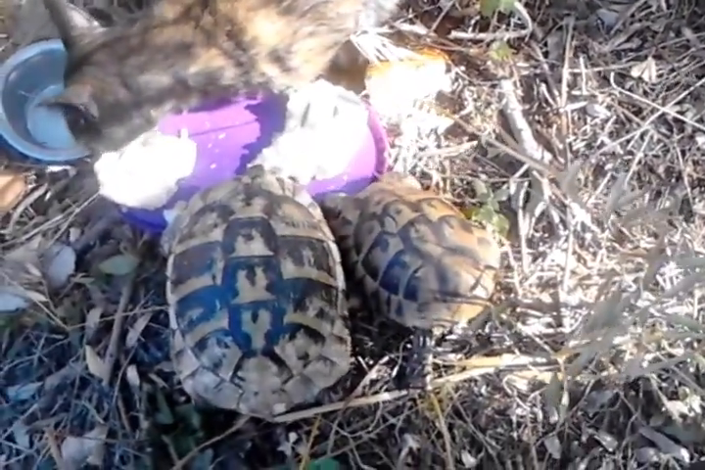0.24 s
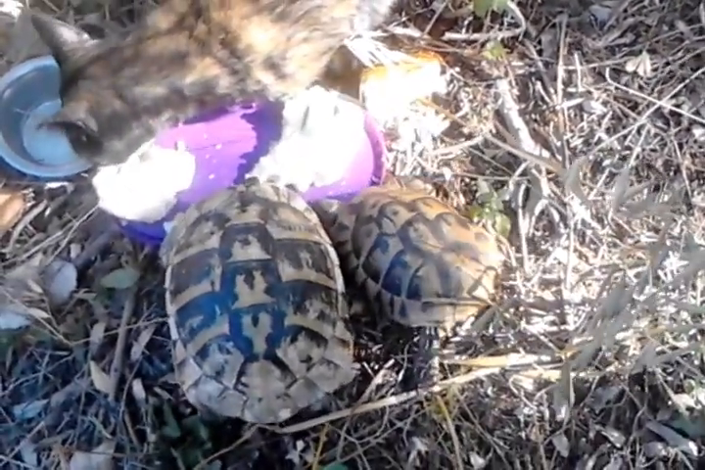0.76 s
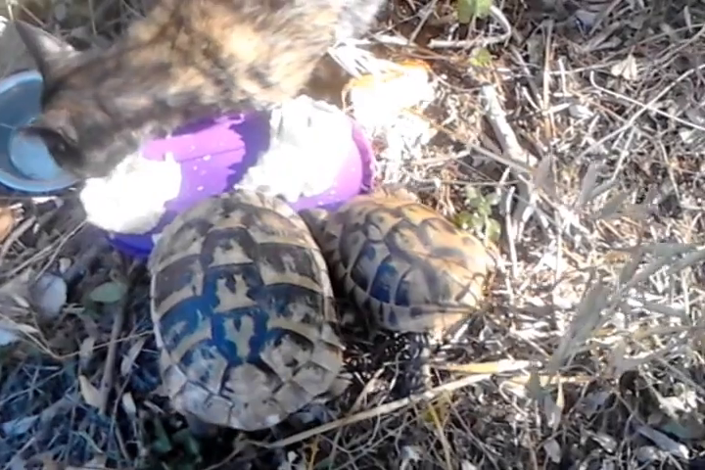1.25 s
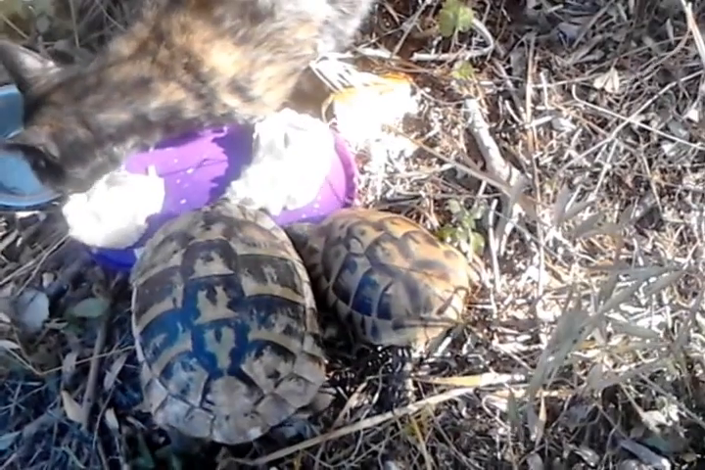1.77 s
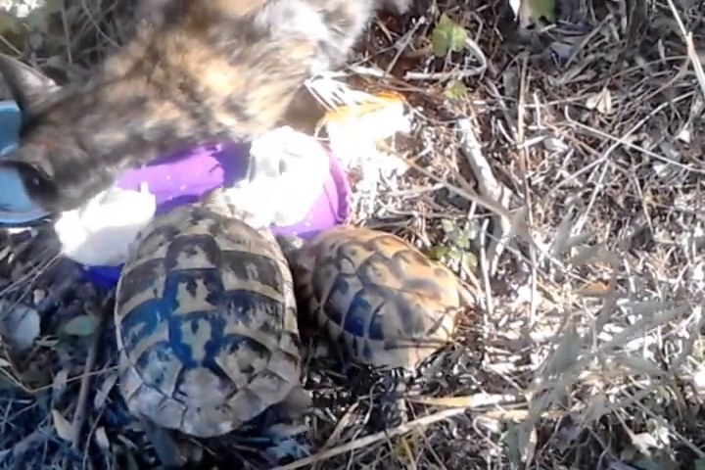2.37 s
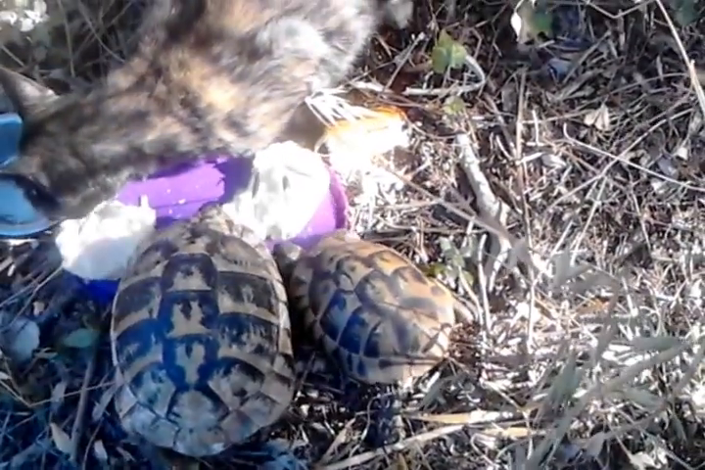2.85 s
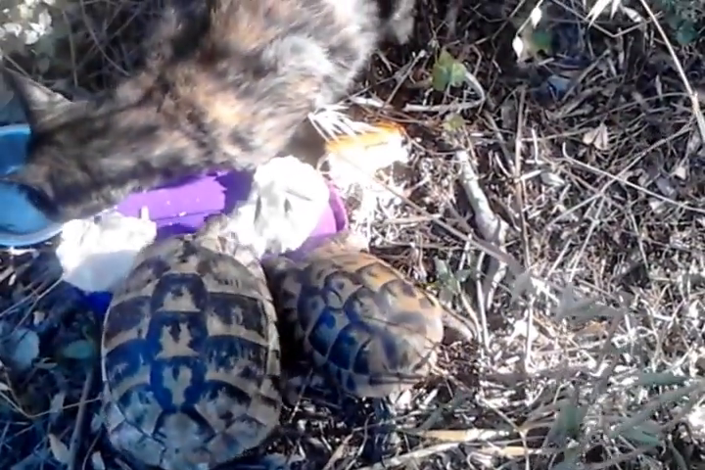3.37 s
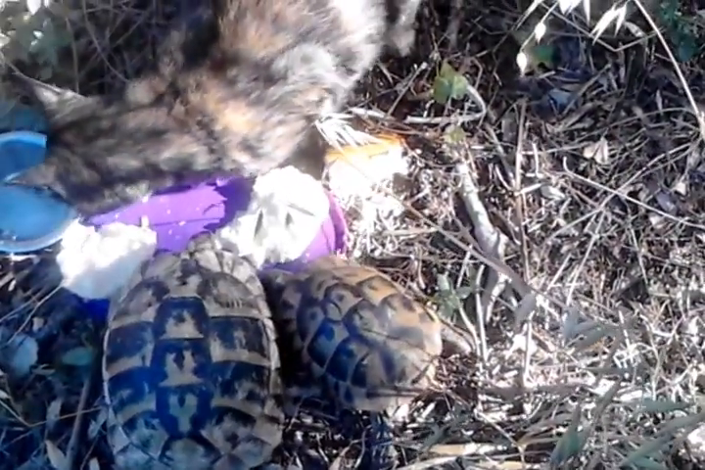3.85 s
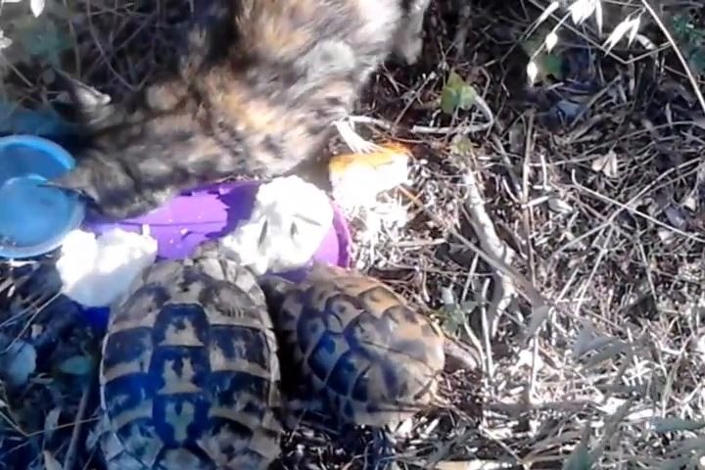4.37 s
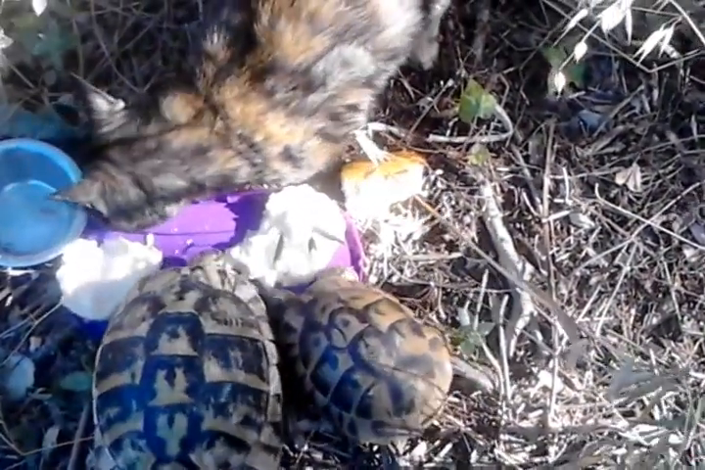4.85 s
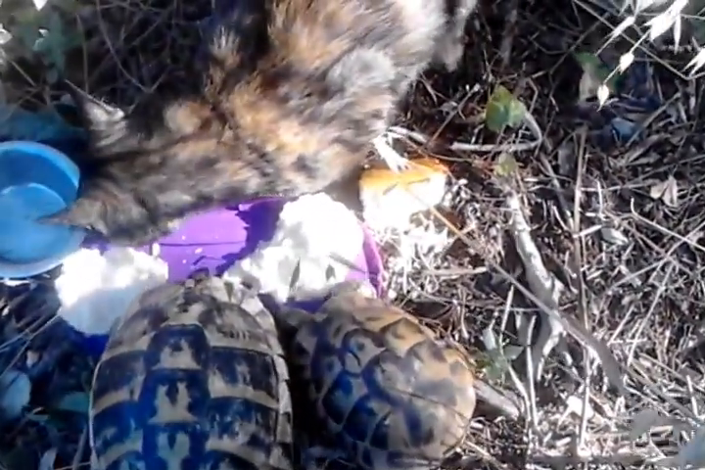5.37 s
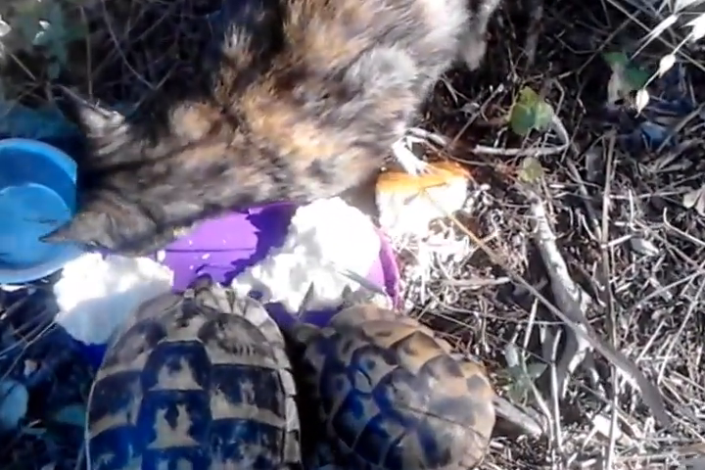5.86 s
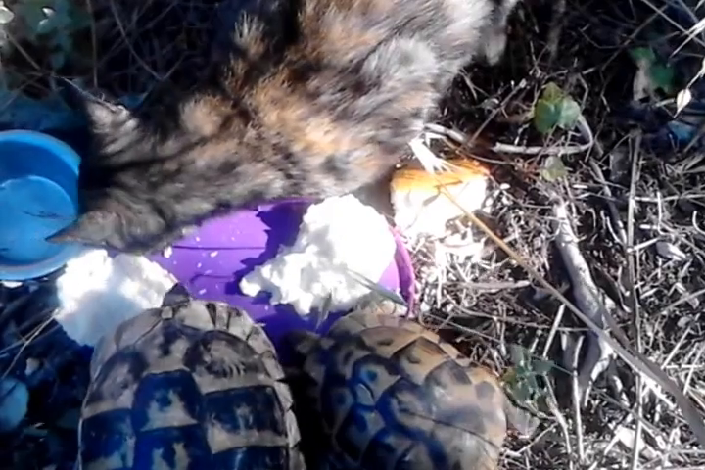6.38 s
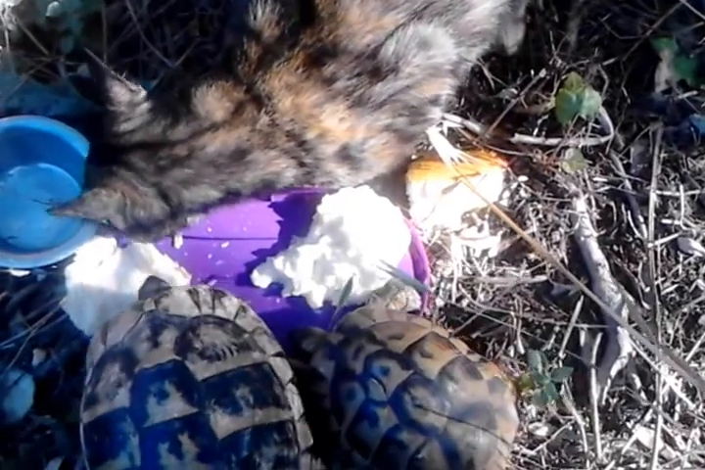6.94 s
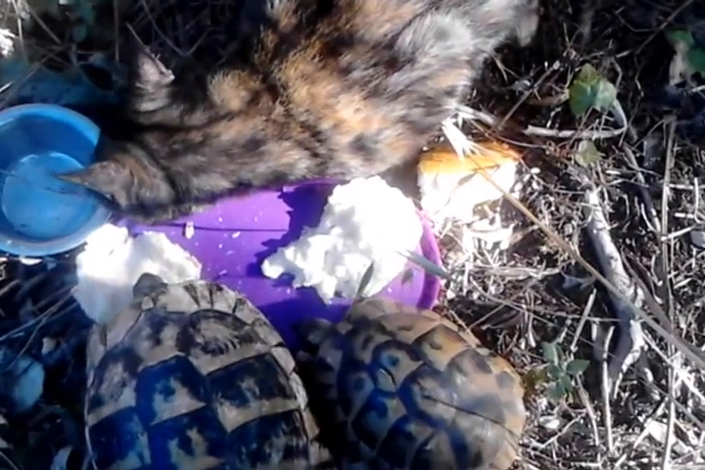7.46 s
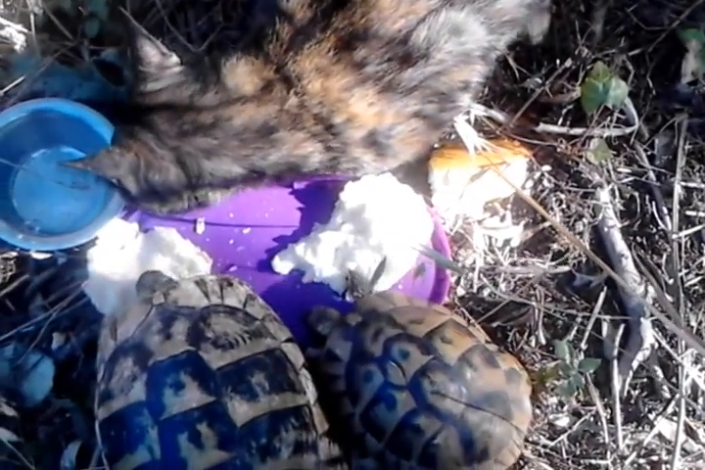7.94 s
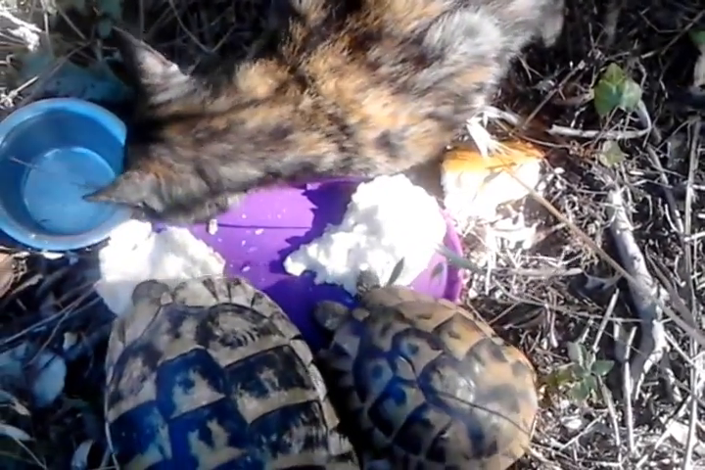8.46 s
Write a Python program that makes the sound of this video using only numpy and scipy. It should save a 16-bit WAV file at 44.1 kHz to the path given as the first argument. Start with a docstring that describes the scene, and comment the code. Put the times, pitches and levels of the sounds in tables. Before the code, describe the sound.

Tortoises and a cat feed outdoors: sparse tiny clicks, a few hard plastic knocks, one short groaning shove across litter, faint chirps far off.

```python
"""Cat and tortoises feeding

A cat and two tortoises feed from plastic bowls on dry leaves, close to a phone in a quiet garden.
Damped pops make the jaw ticks and bowl knocks; shaken resonances make the shove over the litter.
Gliding tones make small far-off birds, and shaped noise makes the outdoor hush.
The hush swells near some knocks and sinks back slowly. Mono, dull on top.
"""
import sys
import numpy as np
from scipy import signal
from scipy.fft import rfft, irfft, next_fast_len
from scipy.io import wavfile
from scipy.ndimage import map_coordinates

SR = 44100
rng = np.random.default_rng(int(sys.argv[2]) if len(sys.argv) > 2 else 0)


def generate_wav(sig):
    """Save sig (samples, or channels by samples) to the path in sys.argv[1] as 16-bit PCM at SR."""
    pcm = np.round(np.clip(np.atleast_2d(sig).T, -1, 1) * 32767).astype(np.int16)
    wavfile.write(sys.argv[1], SR, pcm)


N = 384111
TIME = np.arange(N) / SR  # whole scene [s]
AGE = np.arange(8192) / SR  # within one short sound [s]

# Knocks at the bowls: (time [s], contact level [dB], contact pitch [Hz], contact time constant [ms],
# wall echo [0-1], bowl ring level [dB], thud level [dB], thud pitch [Hz], hollow tail level [dB],
# tail width [share of thud pitch], leaf crackle level [dB])
KNOCKS = [(2.2975, -37, 900, 0.34, 0.6, -72.5, -46, 790, -43.5, 0.28, -69),
          (2.349, -46, 845, 0.71, 0.1, -80, -50, 680, -43.5, 0.57, -80.5),
          (2.361, -37, 600, 1, 0.2, -65, -32.5, 355, -54, 0.79, -65.5),
          (2.445, -16.5, 1510, 0.23, 0, -52, -33, 408, -50, 0.93, -46),
          (2.446, -21, 1715, 0.3, 0.04, -49, -33, 1120, -50, 0.46, -50.5),
          (2.4789, -35, 2760, 0.39, 0.4, -46, -44.5, 442, -36, 0.99, -44.5),
          (2.4828, -24, 900, 0.38, 0.1, -56, -34, 890, -55, 0.27, -45),
          (2.4888, -29, 1030, 0.64, 0.1, -50, -22, 895, -42, 0.16, -49),
          (2.4918, -32, 2310, 0.14, 0, -51, -43, 553, -42.5, 0.33, -56),
          (2.804, -9.5, 2188, 0.1, 0.05, -19.5, -31, 520, -45.5, 0.5, -41),
          (2.8085, -35, 1610, 0.18, 0, -53, -39, 385, -52, .8, -59),
          (2.8187, -41, 2664, 0.38, 0.08, -41.5, -36, 560, -44, 0.26, -53),
          (2.841, -50.5, 1600, 0.37, 0.01, -56, -49.5, 560, -52, .3, -65.5),
          (4.7255, -23, 2120, 0.19, 0.8, -56, -30.5, 700, -39, 0.81, -51),
          (4.7326, -25.5, 2420, 0.49, 0.13, -38.5, -31, 448, -42, 0.64, -45.5),
          (4.74, -53, 1040, 0.71, 0.2, -55, -34.5, 365, -51.5, 0.56, -56),
          (4.751, -50, 3050, .9, 0, -53, -44, 420, -58, .6, -61),
          (6.2193, -18.5, 1880, 0.2, 0.36, -76, -34, 867, -50, 0.26, -60),
          (6.2268, -40.5, 2300, 0.15, 0.1, -66.5, -43.5, 860, -70, .3, -75)]
# Modes of a plastic bowl: (frequency [Hz], relative level [dB], t60 [s])
BOWL_MODES = [(580.3, -15, 0.28), (1121, -6, 0.045), (1283, -0.5, 0.046), (1790, 6.5, 0.023),
              (2032, -6, 0.019), (2580, -2, 0.038), (2780, -6.5, 0.017), (3206, 0.5, 0.034),
              (3320, -2.5, 0.025), (3827, -10, .025), (4205, -7, 0.024), (4470, -9.5, 0.033),
              (5200, -4.5, 0.02), (5904, -2.5, 0.022), (6770, -4.5, 0.017), (7170, 2, 0.02)]

# Bowl shoved over dry leaves in lurches: (time [s], hold [s], body level [dB], crackle level [dB])
SHOVES = [(2.302, 0.04, -60.5, -83.5), (2.366, 0.064, -56, -67.5), (2.448, 0.019, -36, -50),
          (2.474, 0.02, -41.5, -54), (2.505, 0.014, -50, -56), (2.524, 0.0046, -59, -57),
          (2.537, 0.0029, -56, -70), (2.548, 0.014, -54.5, -69), (2.585, 0.035, -64.5, -79)]
SHOVE_RISE_DB_PER_S, SHOVE_FALL_DB_PER_S = 3007, 808
# Resonances of the sliding bowl: (frequency [Hz], width per pass [Hz], relative level [dB])
SHOVE_MODES = [(373, 26, -1), (415, 19, -4), (474, 41, 2.5), (577, 55, 2), (755, 27, 4), (794, 27, 8),
               (884, 31, 10), (949, 40, 7), (1134, 130, -6.5), (1263, 180, 1), (1810, 150, -6.5),
               (2040, 71, -12.5), (2486, 110, -9), (2650, 110, -18.5)]
# Mean pitch of the groan of the sliding bowl: (time [s], pitch [Hz])
GROAN_PITCH = [(2.40, 500), (2.448, 396.5), (2.485, 484), (2.515, 537), (2.545, 601)]
# Bowl resonances under scraping twigs: (frequency [Hz], width per pass [Hz], relative level [dB])
SCRAPE_MODES = [(2080, 110, 4.5), (2440, 70, 5), (2790, 90, -2.5), (3160, 140, 2.5), (3430, 140, -4),
                (4220, 96, -1.5), (4630, 66, 1.5), (5700, 240, -0.5), (6330, 130, -5), (7000, 170, -6)]
# Spectrum of cracking leaves: (frequency [Hz], relative density [dB per Hz])
LEAF_SPECTRUM = [(1180, -45.5), (2000, 1.5), (2860, -5), (3320, -2.5), (4920, -7), (6430, -5.5),
                 (7280, -48), (7800, -62.5), (10100, -76), (17200, -120)]

# Clearer ticks of jaws and snapping litter: (time [s], level [dB], pitch [Hz], time constant [ms])
TICKS = [(0.383, -51.5, 453, 0.35), (.387, -51, 2000, 0.04), (.394, -57, 750, 0.34), (.579, -60, 750, 0.43),
         (.6495, -58, 1150, 0.35), (.65, -62, 5400, 0.18), (0.75, -52, 1620, 0.42), (.886, -58, 4100, 0.35),
         (1.777, -47, 2720, 0.54), (1.803, -61, 5940, 0.14), (2.289, -46, 700, 0.27),
         (2.4563, -41, 5430, .25), (2.462, -29.5, 2900, 0.25), (2.481, -46, 5940, 0.22),
         (2.507, -43, 4170, .09), (2.524, -48, 6000, 0.23), (2.515, -43, 3200, .6),
         (2.5385, -42.5, 3360, 0.43), (2.54, -51, 5970, 0.19), (2.549, -51, 3350, .7),
         (2.558, -56, 3450, .9), (2.864, -54, 3000, .1), (4.077, -54.5, 2760, 0.33),
         (4.283, -44.5, 2680, 0.24), (4.512, -53.5, 617, 0.63), (4.7258, -37.5, 790, .35),
         (4.7335, -41, 6000, 0.26), (4.744, -47, 6000, .45), (4.791, -53.5, 2900, 0.53),
         (4.7915, -50, 5600, 0.16), (4.799, -56, 2900, .35), (4.8176, -48, 5300, .15),
         (4.824, -59, 2800, .4), (4.877, -55, 5800, .12), (4.97, -60, 2920, .5), (4.996, -48, 4760, 0.17),
         (5.045, -47, 5340, 0.09), (5.089, -57.5, 5900, .15), (5.1164, -35, 5870, 0.36),
         (5.117, -55, 1650, 0.89), (5.1185, -60, 2730, .5), (5.119, -48, 4100, 0.8),
         (5.1195, -46, 6730, 0.69), (5.243, -48.5, 5470, 0.088), (5.296, -53, 5300, 0.091),
         (5.342, -56, 6850, 0.32), (5.368, -52, 5020, 0.23), (5.3911, -31, 5250, 0.16),
         (5.814, -52.5, 3140, 0.069), (5.924, -53.5, 6870, 0.69), (5.946, -43, 6470, 0.14),
         (5.998, -47.5, 3350, 0.33), (6, -52.5, 6700, 0.23), (6.113, -53, 6910, 0.59),
         (6.81, -55, 5450, 0.13), (7.04, -64, 5020, 0.094), (7.073, -48.5, 6060, 0.52),
         (7.082, -44.5, 1100, 0.17), (7.131, -54, 4550, .12), (7.21, -62.5, 4800, 0.11),
         (7.45, -61, 3480, 0.16), (7.657, -54.5, 684, 0.78), (7.71, -40.5, 1390, 0.038),
         (7.711, -71.5, 2870, .3), (7.746, -43.5, 6200, 0.14), (7.746, -57, 2810, 0.48)]
# Faint ticks at random times; level and pitch drawn evenly from these ranges
FAINT_TICK_DB, FAINT_TICK_SPREAD_DB, FAINT_TICK_MS = -66, 3, 0.17
FAINT_TICK_LOW_HZ, FAINT_TICK_HIGH_HZ = 2470, 6800

# Tones of a beak slipping on the bowl: (time [s], hold [s], top pitch [Hz], level [dB])
SLIP_TONES = [(0.744, 0.0083, 1130, -46.5), (0.748, 0.0055, 1384, -49.5)]
# Dry leaves rustling under shifting feet: (time [s], length [s], level [dB], centre [Hz])
RUSTLES = [(0.749, 0.084, -79, 6400), (2.411, 0.035, -51.5, 2210), (2.515, 0.048, -67, 3450),
           (2.737, 0.028, -67.5, 2750), (3.384, 0.063, -81, 6460), (5.24, 0.056, -71.5, 6830),
           (5.329, 0.13, -72.5, 6350), (5.914, 0.068, -70.5, 6400), (6.108, 0.011, -65, 6400),
           (6.514, 0.084, -76, 6050), (7.435, 0.027, -73.5, 4720), (8.564, 0.023, -77.5, 5300)]
# Soft, dull bumps: (time [s], length [s], level [dB], centre [Hz])
BUMPS = [(2.44, 0.052, -58, 133), (2.826, 0.064, -62.5, 140), (3.01, 0.078, -62, 132),
         (3.41, 0.074, -60.5, 147.5), (4.725, 0.042, -58.5, 155)]
# Thin whistles of uncertain source: (time [s], hold [s], top pitch [Hz], level [dB])
WHISTLES = [(2.229, 0.017, 1296, -74.5), (2.411, .004, 1357, -58.5), (2.736, 0.08, 1315, -47.5)]

# Notes of small birds: (time [s], nominal length [s], start pitch [Hz], end pitch [Hz],
# level [dB], hoarseness [clipped to 0-1])
BIRD_NOTES = [(0.052, 0.1, 5200, 4960, -78, 1.2), (0.18, 0.04, 4500, 4380, -79, 0.5),
              (0.318, 0.072, 4180, 4236, -62.5, 0), (0.388, 0.04, 4220, 4280, -70, 0.06),
              (0.428, 0.018, 4310, 4290, -57.5, 0.01), (0.444, 0.054, 4350, 4270, -67, 0.24),
              (0.877, 0.068, 2590, 2570, -73.5, 0), (1.347, 0.022, 4800, 4790, -65.5, 0.05),
              (1.376, 0.02, 4820, 4800, -69, 0.15), (1.413, 0.024, 4240, 4240, -61.5, 0.3),
              (1.833, 0.03, 5600, 5560, -73, 0.16), (1.863, 0.04, 5620, 5480, -68.5, 0.82),
              (1.943, 0.032, 5430, 4370, -79, 0.3), (2.01, 0.038, 4150, 4580, -73, 0.14),
              (2.263, 0.032, 5400, 5200, -77, .6), (2.343, 0.073, 5300, 5100, -70, 0.77),
              (2.361, 0.12, 4200, 4280, -59, 0.08), (2.46, .05, 4280, 4200, -61, 0.1),
              (2.587, .06, 4250, 4280, -79, 0), (2.694, 0.053, 4420, 4290, -83, 0.2),
              (3.548, 0.16, 4400, 4400, -81.5, 0.12), (3.99, 0.09, 4220, 4210, -68, 0),
              (4.085, 0.096, 4250, 4290, -79, 0.06), (4.385, 0.085, 4190, 4200, -71, 0.04),
              (4.783, 0.047, 5380, 5420, -65, 0.55), (4.802, 0.07, 5400, 5400, -64, 0.1),
              (4.819, 0.074, 5080, 4920, -61.5, 0.3), (4.823, 0.11, 4590, 4390, -69, 0.6),
              (4.89, 0.035, 5100, 5230, -64, 0.47), (5.033, 0.052, 5450, 5600, -71, 0.3),
              (5.17, 0.037, 5080, 5370, -66.5, 0.3), (5.186, 0.022, 4430, 4400, -66, 0.4),
              (5.242, 0.025, 5430, 5460, -65, 0.54), (5.245, 0.051, 5080, 5000, -66, 0.57),
              (5.32, 0.034, 4310, 4430, -65, 0.55), (7.138, 0.057, 4060, 4190, -71, 0.02),
              (8.077, 0.018, 4340, 4330, -66.5, 0), (8.448, 0.15, 4220, 4170, -84.5, 0.11),
              (8.568, 0.034, 4274, 4340, -67, 0.3), (8.611, 0.039, 4370, 4330, -66.5, 0.2),
              (8.615, 0.043, 6500, 6250, -77, .15)]
TWITTER_HZ = 170  # pitch scatter added to a fully hoarse note

# Low wash of the hush at rest: (time [s], level [dB])
HUSH_REST = [(0, -71.5), (1.1, -72.5), (2.1, -69), (8.7, -69.5)]
# Spectrum of the low wash: (frequency [Hz], relative density [dB per Hz])
LOW_SPECTRUM = [(20, -14.5), (45, -23.5), (75, -31.5), (112, -3.5), (135, 0.5), (220, -4), (310, -5),
                (370, -7), (600, -5.5), (900, -6.5), (1400, -13), (2000, -18), (3500, -42)]
# Spectrum of the hiss: (frequency [Hz], relative density [dB per Hz])
HISS_SPECTRUM = [(1060, -12.5), (1800, -3.5), (2820, -2.5), (3280, -4), (4150, -5), (6680, -10),
                 (8000, -18), (10400, -66), (17600, -120)]
HISS_DB = -80  # hiss at rest
HUM_HZ, HUM_DB = 124, -19  # distant drone, level relative to the low wash
# Swells of the hush: (time [s], level [dB])
SWELLS = [(2.459, -61.5), (2.82, -61.5), (4.76, -61)]
SWELL_RISE_DB_PER_S, SWELL_FALL_DB_PER_S = 298.5, 9.5
SWELL_HISS_DB, SWELL_HISS_FALL_DB_PER_S = -13, 7.5  # hiss of a swell: relative level, fall

TOP_HZ = 7500


def knocks(thud_ms=1.3, wall_echo_ms=0.91, crackle_t60_s=0.09, hollow_cycles=80, low_edge=0.71):
    """Each blow clicks at the contact, rings the bowl, thuds into the ground and crackles the leaves."""
    out = np.zeros(N)
    ring = bowl_ring()
    for (s, contact_db, contact_hz, contact_ms, echo, ring_db,
         thud_db, thud_hz, tail_db, tail_width, crackle_db) in KNOCKS:
        cracks = grains(rate_hz=1200, spread_db=1.0, size=len(AGE))
        noise = rng.standard_normal(len(AGE))
        # inverted echo from across the bowl hollows the click
        click = pop(contact_hz, contact_ms)
        click = click - echo * np.interp(AGE - wall_echo_ms / 1000, AGE, click)
        crackle = colour(cracks, LEAF_SPECTRUM) * fade(crackle_t60_s)
        # low body lingers around the thud pitch
        hollow = band(noise, thud_hz, tail_width * thud_hz)
        hollow = hollow * fade(hollow_cycles / thud_hz) * (1 - fade(0.01985))
        blow = undb(contact_db) * click + undb(ring_db) * ring + undb(crackle_db) * crackle
        body = undb(thud_db) * pop(thud_hz, thud_ms) + undb(tail_db) * hollow
        # little is radiated below the lowest resonance
        add(out, s, high_pass(blow + body, low_edge * thud_hz, order=3))
    return scatter(out, wet_db=-18, t60_s=0.061)


def bowl_ring():
    """A tapped bowl rings as decaying modes of alternating sign."""
    ring = np.zeros(len(AGE))
    for k, (hz, db, t60_s) in enumerate(BOWL_MODES):
        ring += (-1) ** k * undb(db) * fade(t60_s) * np.sin(2 * np.pi * hz * AGE)
    return ring / 2


def shove(catch_db=3.0, groan_db=-6.0, groan_waver=0.055, scrape_db=0.5, leaf_db=-4,
          ground_db=-20, ground_hz=210, ground_width_hz=150):
    """The bowl catches and slips: it groans, jolts shake wall and ground, twigs scrape, leaves crack."""
    catches = undb(catch_db * walk(170))
    jolts = grains(rate_hz=5000, spread_db=-0.5)
    [groan_hz] = curves(GROAN_PITCH)
    groan_phase = 2 * np.pi * np.cumsum(groan_hz * (1 + groan_waver * walk(300))) / SR
    groan = undb(3.0 * walk(130)) * np.sin(groan_phase)
    ground = band(jolts, ground_hz, ground_width_hz)
    body = wall(jolts, SHOVE_MODES) + undb(groan_db) * groan + undb(ground_db) * ground
    scrape = wall(grains(rate_hz=600, spread_db=-1.0), SCRAPE_MODES)
    scrape = flex(scrape, share=0.0058, rate_hz=35)
    leaves = colour(grains(rate_hz=330, spread_db=0.5), LEAF_SPECTRUM)
    crackle = undb(leaf_db) * leaves + undb(scrape_db) * scrape
    out = np.zeros(N)
    for s, hold_s, body_db, crackle_db in SHOVES:
        lurch = envelope(s, hold_s, SHOVE_RISE_DB_PER_S, SHOVE_FALL_DB_PER_S)
        out += lurch * (undb(body_db) * body + undb(crackle_db) * crackle)
    return catches * out


def wall(x, resonances):
    """Shake a set of bowl resonances, each applied twice; rms 1."""
    return unit(sum(undb(db) * resonate(resonate(x, hz, w), hz, w) for hz, w, db in resonances))


def flex(x, share, rate_hz):
    """Changing pressure on the bowl bends all its resonances up and down by a small share."""
    warped_s = TIME + share / rate_hz * walk(rate_hz)
    return map_coordinates(x, [warped_s * SR], mode="mirror")


def chewing(count=26):
    """Jaws part and bits of litter snap as tiny damped pops, some clear and some faint."""
    faint = []
    for when, size, pitch in rng.random((count, 3)):
        db = FAINT_TICK_DB + FAINT_TICK_SPREAD_DB * (2 * size - 1)
        hz = FAINT_TICK_LOW_HZ + pitch * (FAINT_TICK_HIGH_HZ - FAINT_TICK_LOW_HZ)
        faint.append((when * N / SR, db, hz, FAINT_TICK_MS))
    out = np.zeros(N)
    for s, db, hz, time_ms in list(TICKS) + faint:
        add(out, s, undb(db) * pop(hz, time_ms))
    return scatter(out, wet_db=-3.5, t60_s=0.038)


def slip(waver=0.0275):
    """A beak slips on the bowl: a brief squeak roughens as a second resonance joins and beats with it."""
    out = np.zeros(N)
    for s, hold_s, hz, db in SLIP_TONES:
        tone = squeak(s, hz, sag_hz_per_s=1500, flutter_hz=-280, flutter=0.13, waver=waver)
        out += undb(db) * envelope(s, hold_s, rise_db_per_s=4500, fall_db_per_s=1398) * tone
    return out


def rustles(width_hz=1000):
    """Shifting feet break dry leaves: brief swells of tiny fractures."""
    out = np.zeros(N)
    for s, length_s, db, hz in RUSTLES:
        cracks = grains(rate_hz=950, spread_db=4.0, size=len(AGE))
        add(out, s, undb(db) * arch(length_s) * band(cracks, hz, width_hz))
    return out


def bumps(width_hz=70):
    """Soft, dull bumps: bursts of low narrow-band noise swell and die away."""
    out = np.zeros(N)
    for s, length_s, db, hz in BUMPS:
        noise = rng.standard_normal(len(AGE))
        add(out, s, undb(db) * arch(length_s) * band(noise, hz, width_hz))
    return out


def whistle():
    """Thin, unsteady tones swell and fade a little faster."""
    out = np.zeros(N)
    for s, hold_s, hz, db in WHISTLES:
        tone = squeak(s, hz, sag_hz_per_s=570, flutter_hz=25, flutter=0.39, waver=0.02)
        out += undb(db) * envelope(s, hold_s, rise_db_per_s=155, fall_db_per_s=198.5) * tone
    return out


def squeak(s, top_hz, sag_hz_per_s, flutter_hz, flutter, waver):
    """An unsteady tone, mean pitch highest at time s, with a side tone flutter_hz away."""
    hz = np.maximum(top_hz - sag_hz_per_s * np.abs(TIME - s), top_hz / 2)
    phase = 2 * np.pi * np.cumsum(hz * (1 + waver * walk(150))) / SR
    return np.sin(phase) + flutter * np.sin(phase + 2 * np.pi * flutter_hz * TIME)


def birds(rasp_hz=600, waver_hz=24, swell=0.43, flutter_db=3.0, glide_ease=1.8):
    """Short whistles glide and settle on a pitch, some pure, some rasping, smeared by the trees."""
    out = np.zeros(N)
    for s, length_s, start_hz, end_hz, db, hoarse in BIRD_NOTES:
        age = np.arange(int(2 * length_s * SR)) / SR - length_s / 2
        waver, real, imag = (walk(rate, size=len(age)) for rate in (200, rasp_hz, rasp_hz))
        share = np.clip(hoarse, 0, 1)
        glide = (start_hz - end_hz) * np.clip(1 - age / length_s, 0, 1) ** glide_ease
        # hoarseness twitters the pitch and spreads the line into a narrow band
        hz = end_hz + glide + (waver_hz + share * TWITTER_HZ) * waver
        voice = np.sqrt(1 - share) + np.sqrt(share) * (real + 1j * imag)
        note = np.imag(voice * np.exp(2j * np.pi * np.cumsum(hz) / SR))
        shape = np.exp(-((age / length_s - .5) / swell) ** 2 / 2) * signal.windows.tukey(len(age), .5)
        flutter = undb(share * flutter_db * walk(90, size=len(age)))
        add(out, s - length_s / 2, undb(db) * shape * flutter * note)
    return scatter(out, wet_db=-8, t60_s=0.34)


def hush():
    """Far-off outdoor noise: a wavering low wash and thin hiss, and a faint narrow-band drone."""
    [rest_db] = curves(HUSH_REST)
    # rest and swells add in power
    low_gain = np.hypot(undb(rest_db), swells(SWELL_FALL_DB_PER_S))
    hiss_gain = np.hypot(undb(HISS_DB), undb(SWELL_HISS_DB) * swells(SWELL_HISS_FALL_DB_PER_S))
    low = colour(rng.standard_normal(N), LOW_SPECTRUM) * low_gain * undb(1.3 * walk(20))
    hiss = colour(rng.standard_normal(N), HISS_SPECTRUM) * hiss_gain * undb(0.61 * walk(29))
    drone = low_gain * undb(HUM_DB) * band(rng.standard_normal(N), HUM_HZ, 24)
    return low + hiss + drone


def swells(fall_db_per_s):
    """Gain of all swells of the hush, added in power; each sinks at an even rate in dB."""
    power = np.zeros(N)
    for s, db in SWELLS:
        power += (undb(db) * envelope(s, 0, SWELL_RISE_DB_PER_S, fall_db_per_s)) ** 2
    return np.sqrt(power)


def undb(db):
    """Decibels to gain."""
    return 10 ** (np.asarray(db) / 20)


def unit(x):
    """Scale to rms 1."""
    return x / np.sqrt(np.mean(x ** 2))


def curves(table):
    """Columns of a table, joined by straight lines in time."""
    s, *columns = np.transpose(table)
    return [np.interp(TIME, s, c) for c in columns]


def add(out, s, sound):
    """Mix a sound in at time s."""
    i = max(int(s * SR), 0)
    out[i:i + len(sound)] += sound[:max(N - i, 0)]


def colour(x, points):
    """Filter by a spectrum of (frequency [Hz], level [dB]) points; rms 1."""
    hz, db = np.transpose(points)
    size = next_fast_len(len(x))
    f = np.arange(size // 2 + 1) * SR / size
    gain = undb(np.interp(np.log(f + 1), np.log(hz), db))
    return unit(irfft(rfft(x, size) * gain, size)[:len(x)])


def resonate(x, hz, width_hz):
    """One resonance, gain 1 at its centre."""
    return signal.lfilter(*signal.iirpeak(hz, hz / width_hz, fs=SR), x)


def band(x, hz, width_hz):
    """A resonance applied twice, for steep sides; rms 1."""
    return unit(resonate(resonate(x, hz, width_hz), hz, width_hz))


def high_pass(x, hz, order):
    """Cut what lies below hz."""
    return signal.sosfilt(signal.butter(order, hz, "high", fs=SR, output="sos"), x)


def walk(rate_hz, size=N):
    """A random wander with spread near 1, a new target rate_hz times a second."""
    at = np.arange(size) * rate_hz / SR
    return np.interp(at, np.arange(4096), rng.standard_normal(4096))


def grains(rate_hz, spread_db, size=N):
    """Tiny fractures: impulses at random moments, of random sign and exponentially spread dB."""
    happens = rng.random(size) < rate_hz / SR
    sign = rng.choice([-1, 1], size)
    return happens * sign * undb(spread_db * np.minimum(rng.exponential(size=size), 4))


def pop(hz, time_ms):
    """A heavily damped resonance builds up and dies within a few time_ms; envelope peak 1."""
    u = AGE * 1000 / time_ms
    return (u / 2) ** 2 * np.exp(2 - u) * np.sin(2 * np.pi * hz * AGE)


def fade(t60_s):
    """Exponential decay by 60 dB in t60_s."""
    return np.exp(-np.log(1000) * AGE / t60_s)


def arch(length_s):
    """A rounded swell of the given length; peak 1."""
    u = np.clip(AGE / length_s, 0, 1)
    return np.sqrt(4 * u * (1 - u))


def envelope(s, hold_s, rise_db_per_s, fall_db_per_s):
    """Rise to gain 1 at time s, hold, then die away."""
    before_s = np.maximum(s - TIME, 0)
    after_s = np.maximum(TIME - s - hold_s, 0)
    drop_db = rise_db_per_s * before_s + fall_db_per_s * after_s
    return undb(-np.minimum(drop_db, 200))


def scatter(x, wet_db, t60_s):
    """Surroundings (ground, shells, twigs, trees) throw back a brief diffuse tail of decaying noise."""
    tail = rng.standard_normal(len(AGE)) * fade(t60_s) * (1 - fade(0.0039))
    return x + undb(wet_db) * signal.fftconvolve(x, tail / np.linalg.norm(tail))[:N]


def scene():
    """Everything reaches one microphone; the small close sources radiate little deep bass."""
    feeding = high_pass(knocks() + shove() + chewing() + slip() + rustles(), 80, order=1)
    mono = feeding + high_pass(bumps(), 98, order=6) + whistle() + birds() + hush()
    return np.array([mono, mono])


def record(dry):
    """The phone cuts the top steeply."""
    return signal.sosfilt(signal.ellip(8, .2, 70, TOP_HZ, fs=SR, output="sos"), dry)


dry = scene()
out = record(dry)
generate_wav(out)
```